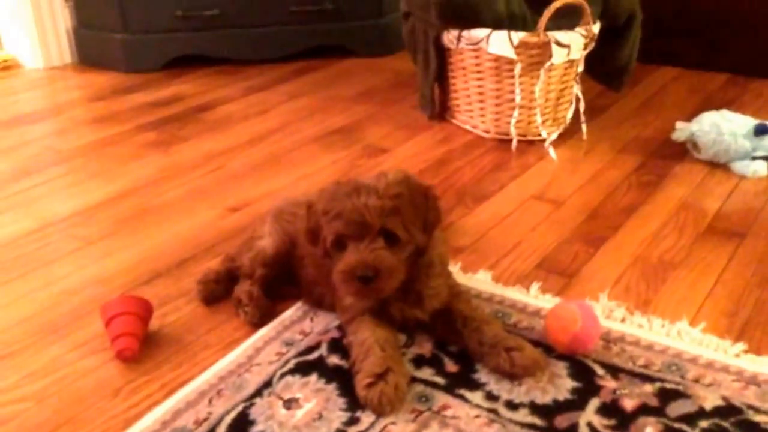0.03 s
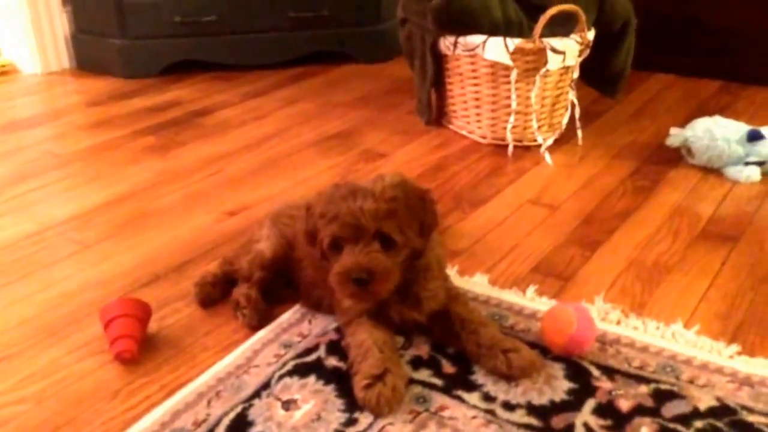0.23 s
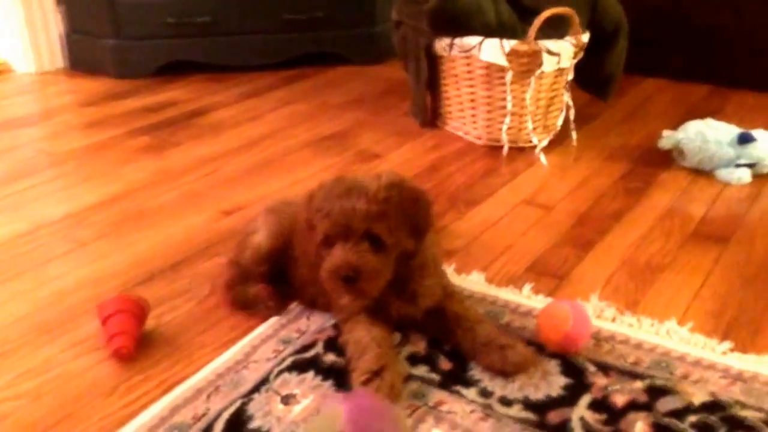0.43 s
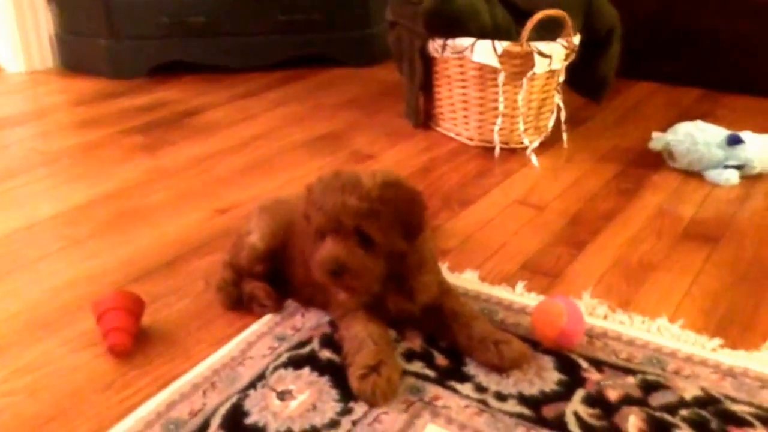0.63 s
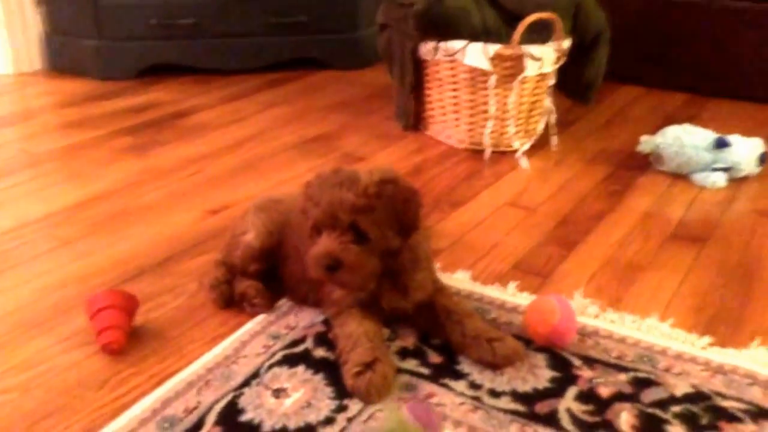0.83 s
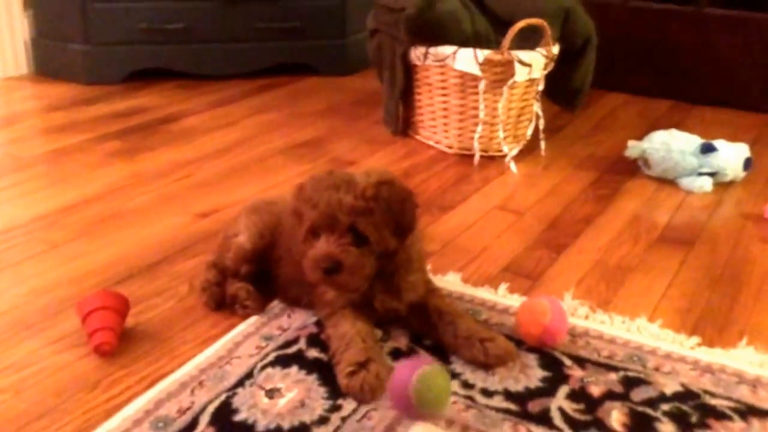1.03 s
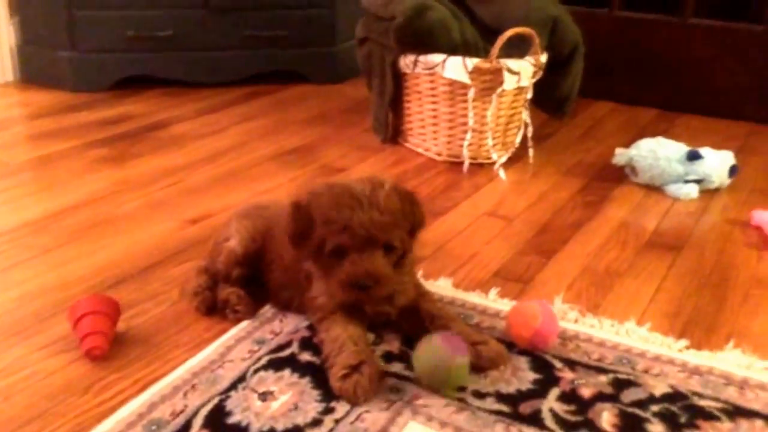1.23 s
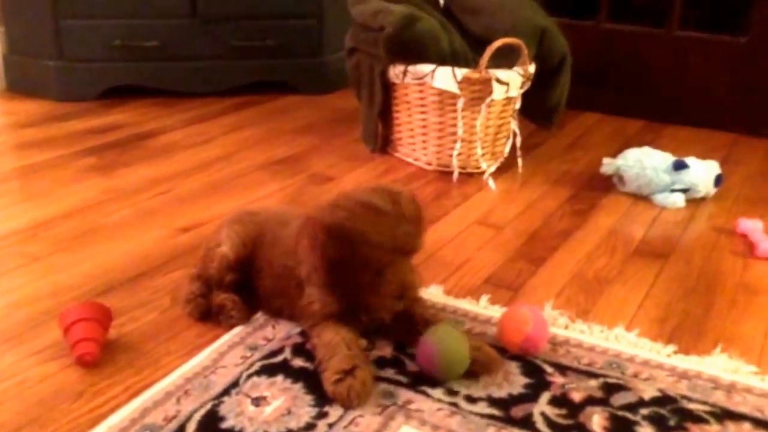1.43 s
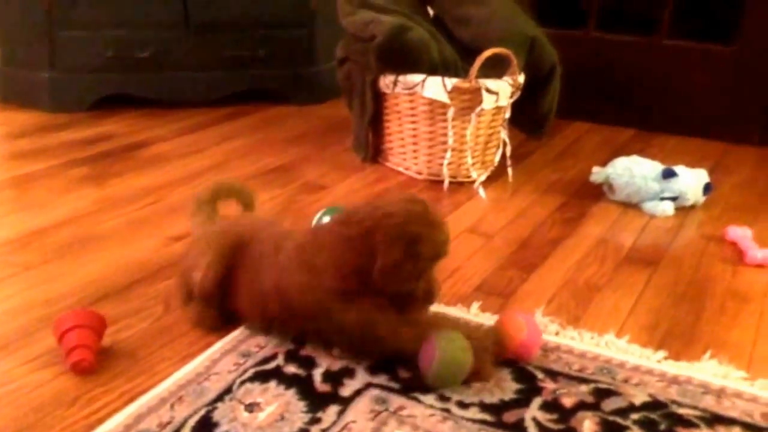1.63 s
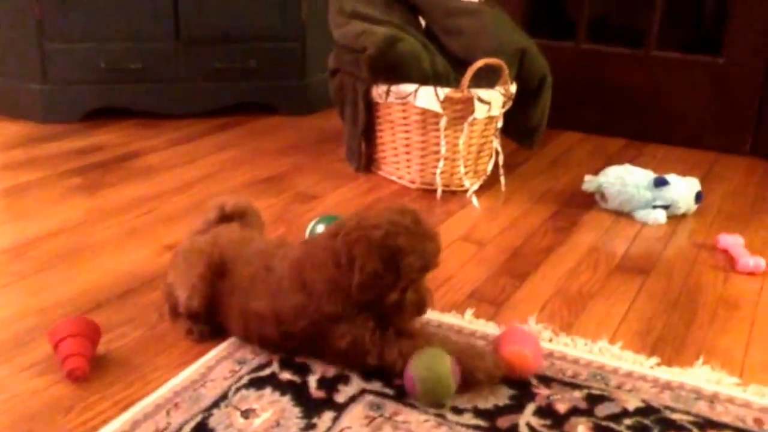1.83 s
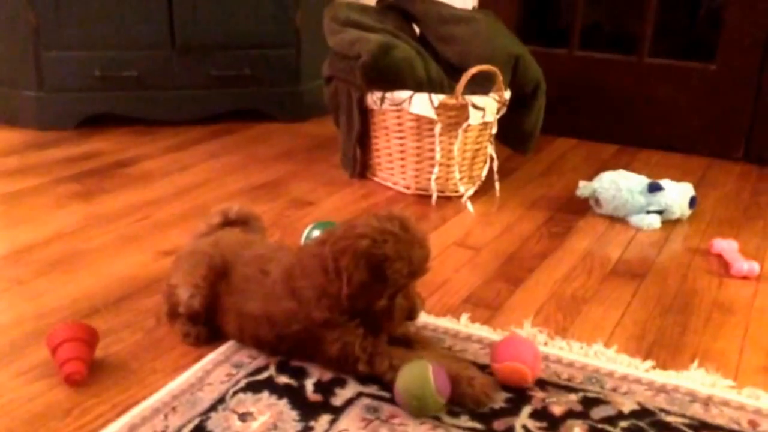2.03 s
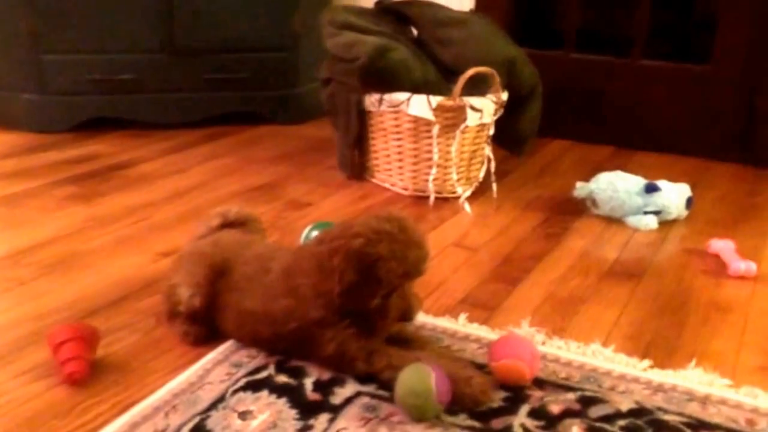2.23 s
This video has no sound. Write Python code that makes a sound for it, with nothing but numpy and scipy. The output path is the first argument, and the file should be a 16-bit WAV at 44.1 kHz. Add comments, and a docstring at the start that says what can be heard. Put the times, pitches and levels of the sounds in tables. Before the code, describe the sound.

In a small quiet room, a tennis ball drops with a hollow pock and low thud, bounces three more times, fading, and rolls on. Soft bumps on the floorboards and a puppy's faint claw ticks follow.

```python
"""A small quiet room with a wooden floor and a rug, in mono, the microphone within earshot of a puppy.
A tennis ball bounces four times, ever softer and duller, then rolls to the puppy. Each bounce is a
short pock of the ball and a low thud of the floorboards, with the room answering behind it.
The rolling ball and the puppy's paws bump the boards; faint claw ticks and rustles sit on the room tone."""
import sys
import numpy as np
from scipy import signal
from scipy.fft import rfft, irfft, next_fast_len
from scipy.io import wavfile

SR = 44100
rng = np.random.default_rng(int(sys.argv[2]) if len(sys.argv) > 2 else 0)


def pcm_store(signal):
    """Save signal as 16-bit PCM."""
    levels = np.round(np.clip(np.atleast_2d(signal), -1, 1) * 32767)
    wavfile.write(sys.argv[1], SR, levels.astype(np.int16).T)


N = 105840
POCK_SLOPE = 4.54  # order of the roll-off above the ball's treble corner


def amp(db):
    """Decibels to gain."""
    return 10 ** (np.asarray(db) / 20)


def along(points, hz):
    """Read a curve of (frequency [Hz], value) points on a log-frequency axis."""
    freqs, values = np.transpose(points)
    return np.interp(np.log(hz + 1), np.log(freqs + 1), values)


def hump(hz, centre_hz, octaves):
    """A bell of height 1 on a log-frequency axis."""
    return np.exp(-.5 * (np.log2((hz + 1) / centre_hz) / octaves) ** 2)


def since(s):
    """Seconds since a moment, for every sample."""
    return np.arange(N) / SR - s


def filtered(x, response):
    """Shape x by a frequency response."""
    size = next_fast_len(N + SR // 2)
    return irfft(rfft(x, size) * response(np.fft.rfftfreq(size, 1 / SR)), size)[:N]


def noise(response):
    """Coloured noise of rms 1."""
    x = filtered(rng.standard_normal(N), response)
    return x / np.sqrt(np.mean(x ** 2) + 1e-20)


def room_tone():
    """The still air of the room: a steady, bass-heavy hush at the microphone."""
    # spectrum of the air (frequency [Hz], relative level [dB])
    spectrum = [(12, -55), (20, -11.5), (87, -1), (143, -6), (242, -10), (319, -12.5), (409, -17.5),
                (1020, -22.5), (1270, -21.5), (1680, -24.5), (1930, -22.5), (2160, -26), (2410, -23),
                (5240, -33), (15000, -44.5)]
    return amp(-62.5) * noise(lambda hz: amp(along(spectrum, hz)))


def room(x, build_s=0.0016):
    """The room's answer: a diffuse tail that builds up briefly and dies at each frequency's own speed."""
    # reverberation time (frequency [Hz], t60 [s])
    decay = [(60, 0.54), (150, 0.24), (400, 0.3), (800, 0.28), (1800, .3), (4000, 0.24), (10000, 0.19)]
    hz, t, spectra = signal.stft(rng.standard_normal(SR // 2), SR, nperseg=256)
    tail = signal.istft(spectra * amp(-60 * t / along(decay, hz)[:, None]), SR, nperseg=256)[1]
    tail *= 1 - np.exp(-np.arange(len(tail)) / SR / build_s)
    return signal.fftconvolve(x, tail / np.linalg.norm(tail))[:N]


def rustles(peak_db=4.5):
    """Brief soft brushing, as of cloth or fur."""
    # brushes (middle [s], half length [s], level [dB], spectral peak [Hz])
    brushes = [(0.63, 0.052, -68.5, 3020), (.748, 0.019, -59.5, 3510), (0.846, 0.03, -60.5, 2340)]
    # their common spectrum (frequency [Hz], relative level [dB])
    spectrum = [(200, -7.5), (700, -13.5), (1200, -5.5), (2500, -7), (4100, -12), (5200, -27),
                (9000, -35.5)]
    out = np.zeros(N)
    for s, half, db, peak_hz in brushes:
        brush = noise(lambda hz: amp(along(spectrum, hz) + peak_db * hump(hz, peak_hz, octaves=.25)))
        out += amp(db) * brush / np.sqrt(1 + np.abs(since(s) / half) ** 3.35)
    return out


def claws(scrape_db=-4.5, room_db=-8):
    """Tiny ticks with a short scrape, as the puppy goes for the ball."""
    # claw ticks (time [s], level [dB], centre [Hz], width [octaves], scrape t60 [s])
    ticks = [(1.266, -55.5, 1960, 0.45, 0.0082), (1.377, -51, 1760, 0.38, 0.026),
             (1.45, -46, 3480, 0.41, 0.0067), (1.511, -53.5, 3060, 0.37, 0.013)]
    out = np.zeros(N)
    for s, db, tick_hz, octaves, t60 in ticks:
        t = since(s)
        colour = lambda hz: hump(hz, tick_hz, octaves)
        tap = filtered(np.arange(N) == round(s * SR), colour)
        scrape = (t >= 0) * amp(scrape_db - 60 * np.abs(t) / t60) * noise(colour)
        out += amp(db) * (tap / tap.max() + scrape)
    return out + amp(room_db) * room(out)


def floor_rumble():
    """The rolling ball and the shifting puppy make the floor rumble and swell at its low notes."""
    # course of the rumble (time [s], level [dB])
    roll = [(.9, -103), (1.0, -51), (1.35, -53), (1.5, -66.5), (1.9, -72.5), (2.1, -61), (2.4, -66.5)]
    # its spectrum (frequency [Hz], relative level [dB])
    spectrum = [(25, -44), (55, 3), (90, -0.5), (125, 8.5), (190, -6.5), (400, -23.5), (1200, -54)]
    # soft bumps on the boards (peak time [s], level [dB], pitch [Hz], rise [s], fall [s])
    bumps = [(0.998, -37, 112, 0.013, 0.014), (1.065, -40, 128, 0.028, 0.015),
             (1.199, -52.5, 131.4, 0.039, 0.053), (1.299, -39.5, 131.3, 0.016, 0.033),
             (1.719, -45.5, 86.4, 0.03, 0.015), (1.997, -49.5, 131.5, 0.011, 0.032),
             (2.094, -51.5, 134, 0.005, 0.031)]
    out = amp(np.interp(since(0), *np.transpose(roll))) * noise(lambda hz: amp(along(spectrum, hz)))
    for s, db, hz, rise, fall in bumps:
        t = since(s)
        swell = np.exp(-(t / np.where(t < 0, rise, fall)) ** 2)
        out += amp(db) * swell * np.cos(2 * np.pi * hz * t)
    return out


def thud(s, top_hz, spot_hz, spot_db, stretch, lag_s=0.00068):
    """The boards swell and ring; the struck spot and the blow's softness weight and damp their modes."""
    # floorboard modes; the heavy low ones take a few cycles to get going
    # (frequency [Hz], relative level [dB], unstretched t60 [s], unstretched swell time [s])
    modes = [(55.9, -9.5, 0.3, 0.014), (70.3, -7, 0.23, 0.023), (86.5, -1.5, 0.21, 0.015),
             (112, 0.5, .19, 0.013), (121.7, -15, 0.096, 0.015), (168.5, -8, 0.2, 0.00084),
             (188, -6, 0.092, 0.00071), (211.3, -11, 0.096, 0.0014), (271.5, -9, 0.056, 0.0017),
             (307.5, -17.5, .09, 0.00079), (400.2, -22, 0.28, 0.0011), (495, -20, 0.092, 0.006)]
    t = since(s + lag_s)
    ringing = (t > -.02) & (t < .6)
    t = t[ringing]
    age = t / stretch
    out = np.zeros(N)
    for hz, db, t60, swell in modes:
        gain = amp(db + spot_db * hump(hz, spot_hz, octaves=0.11)) / np.sqrt(1 + (hz / top_hz) ** 6)
        rise = .5 + .5 * np.tanh((age - swell) / (swell + 0.00092))
        decay = amp(-60 * np.maximum(age, 0) / t60)
        out[ringing] += gain * rise * decay * np.sin(2 * np.pi * hz * t)
    return out


def shell(s, top_hz):
    """The hollow ball rings faintly after the blow."""
    # modes of the ball (frequency [Hz], relative level [dB], t60 [s])
    modes = [(1012, -26.5, .11), (1340, -35.5, 0.038), (1768, -29.5, 0.29)]
    t = np.maximum(since(s), 0)
    return sum(amp(db - 60 * t / t60) * np.sin(2 * np.pi * hz * t) / (1 + (hz / top_hz) ** POCK_SLOPE)
               for hz, db, t60 in modes)


def pock(s, top_hz):
    """The ball's shell snaps in: one dip of pressure, duller when the contact is softer."""
    # spectrum of the snap (frequency [Hz], relative level [dB])
    spectrum = [(100, -25), (400, -1.5), (560, -1.5), (770, -4.5), (1000, 3.5), (1600, 2.5), (3000, 1),
                (4200, -5), (5500, -23), (8000, -18.5)]
    pulse = np.zeros(N)
    pulse[round(s * SR)] = -1
    pulse = filtered(pulse, lambda hz: amp(along(spectrum, hz)) / (1 + (hz / top_hz) ** POCK_SLOPE))
    return pulse / np.abs(pulse).max()


def ball(thud_room_db=-8):
    """In front, every bounce: pock, its nearest echo, the ball's ring, thud and the room's answer."""
    # bounces (time [s], thud gain [dB], thud corner [Hz], struck spot's note [Hz], its boost [dB],
    # thud stretch [ratio], pock peak [dB], pock corner [Hz], ring and room [dB re pock],
    # echo delay [s], echo [dB re pock])
    bounces = [(.2091, -19, 335, 118.2, 11, 0.65, -12, 3060, -11, 0.013, -18.5),
               (0.6313, -19.5, 307, 193.3, 7.5, 0.87, -22.5, 2310, -3.5, 0.00305, -5),
               (.921, -26, 196, 150, 3, 0.94, -32.5, 1610, -9, 0.014, -15),
               (1.117, -31, 130, 91.6, 10.5, 0.39, -41.5, 1070, -6.5, 0.017, -9)]
    out = np.zeros(N)
    for s, thud_db, thud_hz, spot_hz, spot_db, stretch, pock_db, pock_hz, tail_db, lag, echo_db in bounces:
        snap = amp(pock_db) * pock(s, pock_hz)
        boards = amp(thud_db) * thud(s, thud_hz, spot_hz, spot_db, stretch)
        echo = amp(echo_db) * np.roll(snap, round(lag * SR))
        ring = amp(pock_db) * shell(s, pock_hz)
        tail = amp(tail_db) * (room(snap) + ring)
        out += snap + echo + tail + boards + amp(thud_room_db) * room(boards)
    return out


def scene():
    """Room tone, ball, floor and puppy, as they reach the one microphone."""
    return (room_tone() + ball() + floor_rumble() + claws() + rustles())[None]


def record(dry, low_cut_hz=32, top_hz=15350):
    """The recorder thins the deepest bass and keeps nothing above its band limit."""
    return filtered(dry[0], lambda hz: (1j * hz / (low_cut_hz + 1j * hz)) * (hz < top_hz))[None]


dry = scene()
out = record(dry)
pcm_store(out)
```